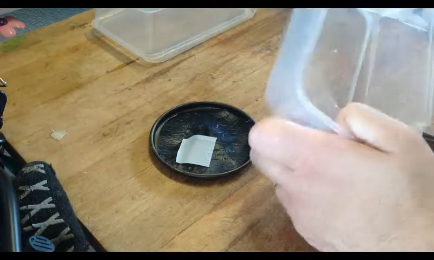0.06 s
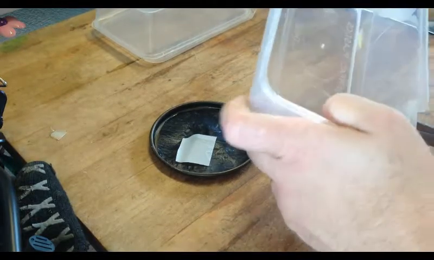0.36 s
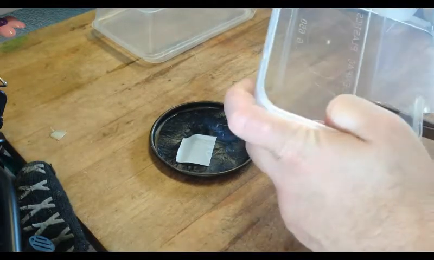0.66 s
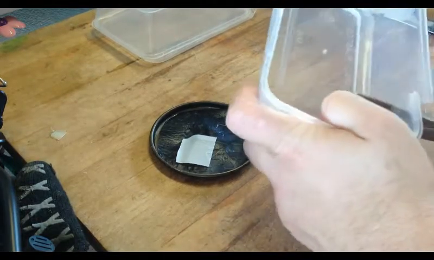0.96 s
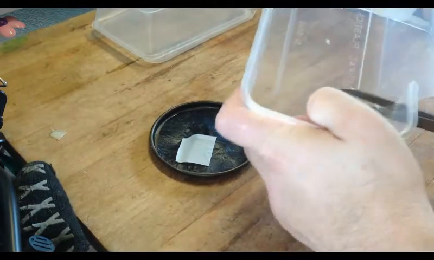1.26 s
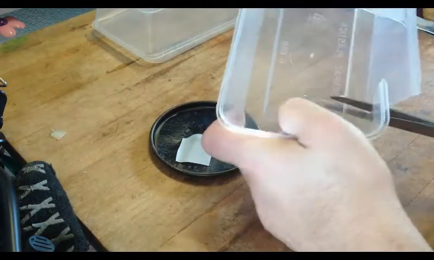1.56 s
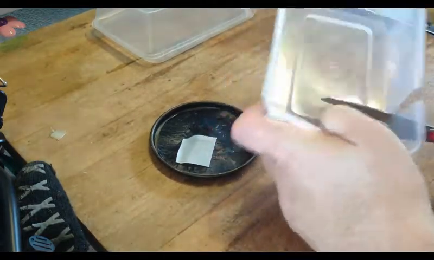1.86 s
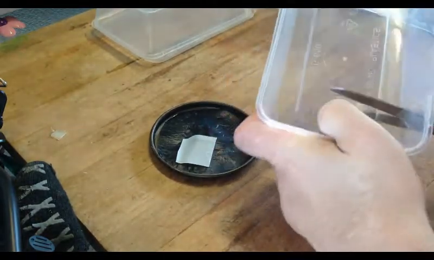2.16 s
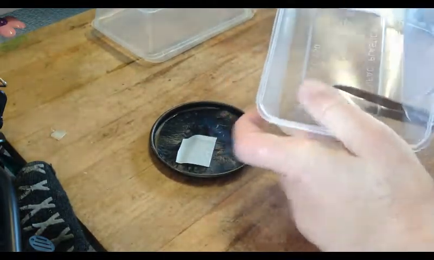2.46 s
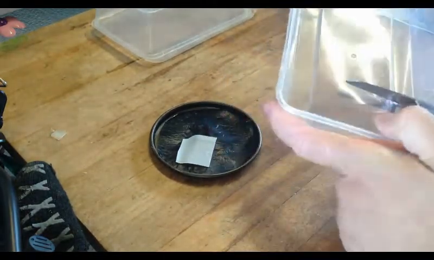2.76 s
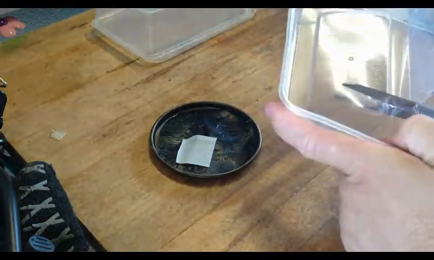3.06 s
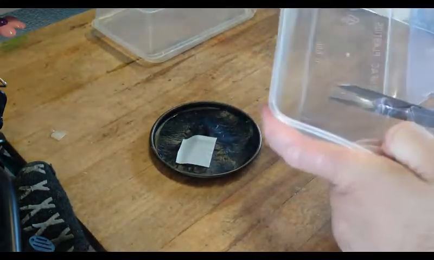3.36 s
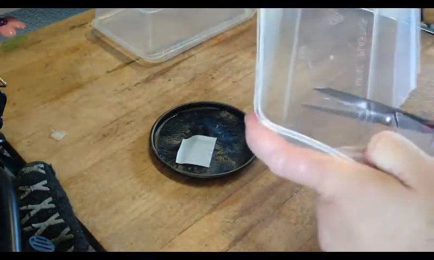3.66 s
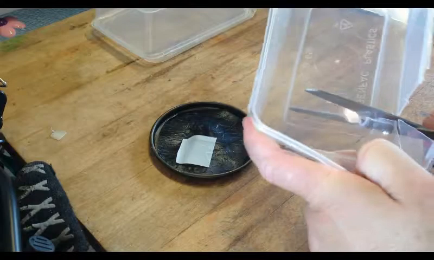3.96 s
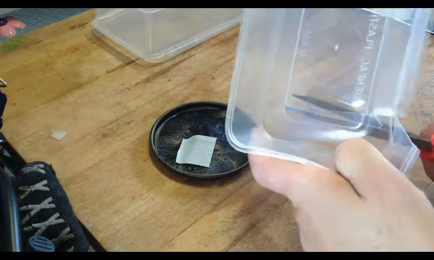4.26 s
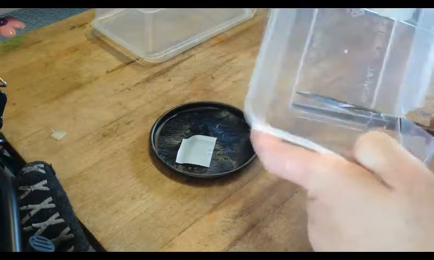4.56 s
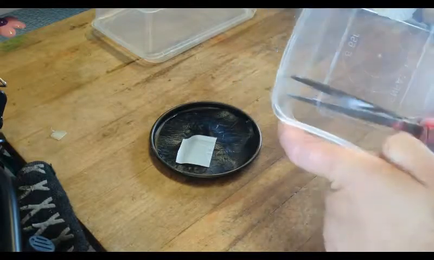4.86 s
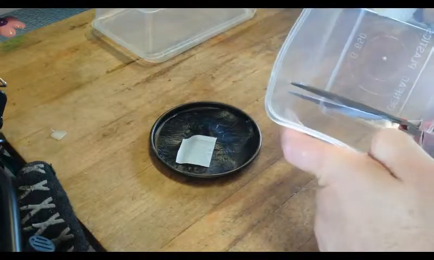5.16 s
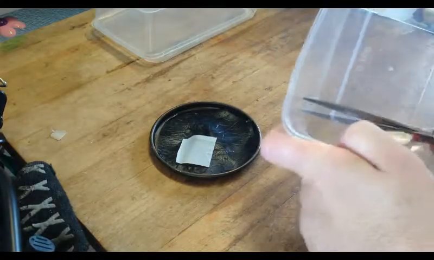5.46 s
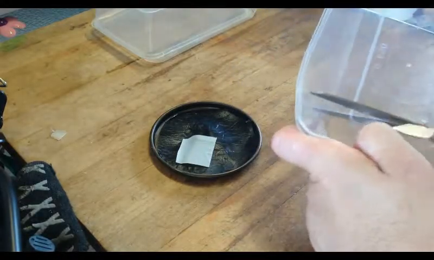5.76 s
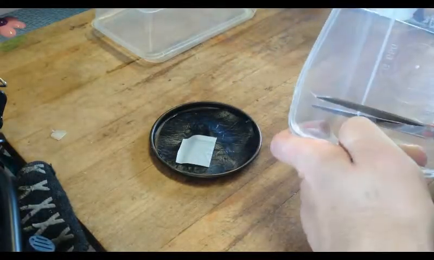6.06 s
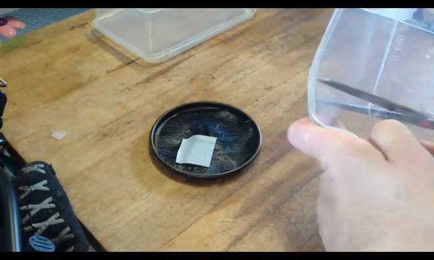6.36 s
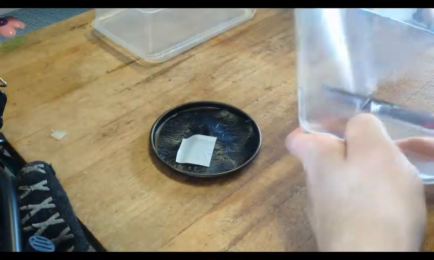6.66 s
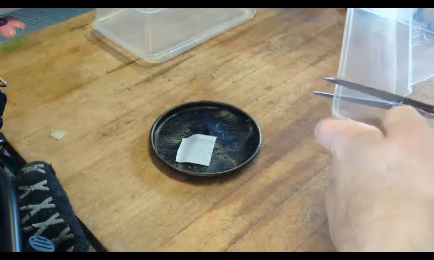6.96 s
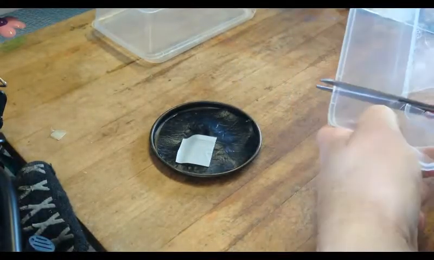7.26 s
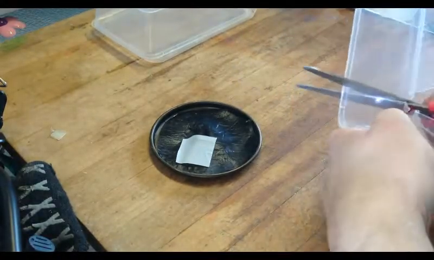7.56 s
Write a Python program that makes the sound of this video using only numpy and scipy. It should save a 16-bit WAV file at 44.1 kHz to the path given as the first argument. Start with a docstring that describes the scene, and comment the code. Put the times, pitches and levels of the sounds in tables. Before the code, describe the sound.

Close up at a workbench in a small room, a rigid plastic container snaps under scissor blades. The first hard cracks mix with hollow knocks as the plastic buckles. Gentle handling thuds and rubbing follow, then irregular clusters of loud snaps, growing lighter toward the end. Small scrapes and brief squeaks fill the gaps, and a faint rumble and hiss lie underneath.

```python
"""Scissors cut through a stiff plastic food tub, held above a wooden workbench in a small room.
A sharp crack opens the cut; the bending wall knocks dully, then cracks again just before 2 seconds.
A quieter stretch follows, with soft bumps of the hand. From about 4 seconds the cracks come in bunches,
and lighter ones end the scene. In between, blades and fingers rub, tick and squeak on the plastic.
All along there is a low rumble and a faint hiss; both dip after most of the hardest cracks."""
import sys
import numpy as np
from scipy import signal
from scipy.fft import rfft, irfft
from scipy.io import wavfile

SR = 44100
rng = np.random.default_rng(int(sys.argv[2]) if len(sys.argv) > 2 else 0)


def transcribe(u):
    """Save the signal u as a 16-bit wav file named by the first command-line argument.

    u: samples, shape (n,) or (channels, n), limited to [-1, 1]; the rate is SR.
    q: integer samples, one column per channel.
    """
    v = np.clip(np.atleast_2d(u).T, -1, 1)
    q = np.round(v * 32767).astype(np.int16)
    wavfile.write(sys.argv[1], SR, q)


N = 344024
TIME = np.arange(N) / SR
BAND_EDGES = np.geomspace(70, 17000, 22)   # in Hz: 21 bands, from low to high
BAND_HZ = np.sqrt(BAND_EDGES[1:] * BAND_EDGES[:-1])
BAND_SHARES = np.diff(BAND_EDGES) / (SR / 2)   # how much of the whole range each band covers

# The blades crack through the wall. Each row: start in seconds, level near 3000 Hz in dB, extra dB for
# the middle, extra dB for the treble, ringing pitch in Hz, fade time in seconds.
CRACK_EVENTS = [(0.0773, 13.5, -9, -6.5, 4910, 0.0016), (0.539, -1.5, 0.5, -6.5, 1930, 0.0015),
                (1.0466, -9, -8.5, -7.5, 2580, 0.0032), (1.0915, 5.5, -11, -2.5, 4100, 0.00088),
                (1.2403, 1, -11.5, 2, 7930, 0.00086), (1.755, -1.5, -17, -13.5, 2480, 0.0012),
                (1.7694, 10.5, -4.5, -13, 2536, .0046), (1.7797, 13.5, -1.5, -10.5, 916, 0.0021),
                (2.404, -11.5, -5.5, -7.5, 1770, .015), (2.4595, -30, 9, -1, 4060, 0.002),
                (2.519, -20, -4.5, -2, 4100, .001), (2.9767, -9, -7, -7.5, 2580, .0014),
                (3.8046, 12, -5, -11.5, 930, 0.0021), (4.0349, 3, -1.5, -2, 3910, 0.00097),
                (4.0655, 8, 8, -4, 3750, 0.00096), (4.0722, 5.5, -0.5, -2, 956, 0.0038),
                (4.712, 0, 5, -14, 3860, 0.0021), (4.919, 12, 3.5, -12.5, 1770, 0.0041),
                (4.9338, 18, -17.5, -15, 2630, .001), (5.463, -11.5, 1, -10, 2220, .004),
                (5.5818, -15.5, -5, -14, 2280, .0036), (5.7108, 4, -3, -11, 1705, 0.0041),
                (5.733, -5, 7, -7.5, 290, .003), (5.748, -9, -3.5, -10.5, 2900, .0035),
                (5.801, -11.5, -1.5, -15, 2500, 0.0033), (5.8205, -19.5, 7, 1.5, 1710, 0.0012),
                (5.8548, 8.5, 7, -2, 850, 0.0018), (6.402, -17.5, -0.5, -12, 4770, .0015),
                (6.4212, -10, -9.5, -17.5, 2420, 0.0063), (6.5908, 15.5, 1, -10.5, 4120, 0.0023),
                (6.5994, 11, -0.5, -5, 5000, 0.00081), (6.613, 4.5, 1, -4.5, 2570, 0.0019),
                (7.1283, 7.5, -8, -4.5, 5130, .0012), (7.473, -14, 2.5, -10, 1160, 0.0012),
                (7.52, -7, 7, -11, 2740, 0.0035), (7.531, -9, 2, -11, 2800, 0.0015),
                (7.688, -17.5, -4, -17, 1050, .0027), (7.7684, -10.5, -2.5, -29, 1770, 0.00071),
                (7.7956, -5.5, -12, -17, 3030, 0.0011)]

def cracks(bass_db=-7.5):
    """List the sharp, bright snaps of plastic breaking at the blades."""
    return [(start, band_levels(level_db, middle_db + bass_db, middle_db, treble_db), ring_hz, fade)
            for start, level_db, middle_db, treble_db, ring_hz, fade in CRACK_EVENTS]

def fracture_burst(noise, fade, rise_cycles=0.73, fade_cycles=1.5, click_cycles=0.89, click_share=0.29):
    """One sharp click and a burst of tiny breaks, one row per band; low notes outlast high ones."""
    t, hz = np.arange(2600) / SR, BAND_HZ[:, None]
    attack = (1 - np.exp(-t * hz / rise_cycles)) ** 2
    decay = np.exp(-t / (0.76 * fade + fade_cycles / hz))
    crackle = energy_one(noise[:, :len(t)] * attack * decay)
    # The click starts all bands in step. They overlap and add up, so it is halved.
    click = 0.5 * energy_one(np.sin(2 * np.pi * hz * t) * attack * np.exp(-t * hz / click_cycles))
    return np.sqrt(1 - click_share) * crackle + np.sqrt(click_share) * click

# The bent wall buckles or a finger knocks on it. Each row: start in seconds, level near 1000 Hz in dB,
# extra dB for the bass, frequency in Hz above which it turns dull, ringing pitch in Hz.
KNOCK_EVENTS = [(0.135, -5, -15, 1780, 1070), (0.2717, -6, -6, 1340, 1820),
                (0.4453, -12.5, -35, 1405, 1870), (.88, -4, -4.5, 900, 815), (0.897, 0.5, -6.5, 1070, 826),
                (1.134, 9.5, -14, 2370, 1830), (1.1728, 10, -18, 2080, 1910), (1.19, 5, 4, 2280, 930),
                (1.2703, -6.5, 11, 3600, 1650), (1.4116, -21, 11.5, 3410, 345),
                (1.5869, -17.5, 13.5, 2480, 322), (1.923, -17, -11, 2600, 1670),
                (2.098, -19.5, 2, 2200, 470), (2.1512, -22.5, 7, 1610, 464), (2.283, -21, 8, 2700, 884),
                (2.6394, -11, 0, 1300, 1520), (2.9247, -16, 11, 2480, 955), (3.007, -4, -2, 700, 628),
                (3.077, -28.5, 14, 1400, 272), (3.436, -23, 11.5, 1190, 462), (4.1078, 0.5, -9, 2700, 1010),
                (4.291, -5.5, -6.5, 1700, 1116), (4.589, -19, 14.5, 2800, 280), (4.895, 2, 11, 2450, 884),
                (4.911, 3.5, 11.5, 2700, 424), (4.925, 9.5, -2.5, 1850, 1090),
                (4.9876, 1, -10.5, 2150, 947), (5.3343, -11.5, -3, 2680, 2080),
                (5.3551, -9.5, 1, 1150, 817), (5.5451, -3.5, 2, 2100, 637), (5.5502, 0.5, 2, 2250, 1210),
                (5.6854, -6.5, 1, 2300, 535), (5.836, -4, -3, 1900, 624), (6.3389, -14, 0.5, 2200, 531),
                (6.3513, -9.5, -5, 1580, 834), (6.362, -14.5, 5, 2080, 910), (6.4598, -10, 10, 1500, 650),
                (6.557, 2.5, 8.5, 2090, 390), (6.9109, -2.5, -16, 2500, 2480), (7.247, -5, 9.5, 2900, 285)]

def knocks(fade_s=0.002, db_per_octave=12.5):
    """List the dull knocks: the softer the contact, the lower its treble starts to fall away."""
    bass_share = np.interp(np.log(BAND_HZ), np.log(TONE_RANGES[:2]), [1, 0])
    hits = []
    for start, level_db, bass_db, dull_hz, ring_hz in KNOCK_EVENTS:
        treble_loss_db = db_per_octave * np.maximum(np.log2(BAND_HZ / dull_hz), 0)
        hits.append((start, level_db + bass_db * bass_share - treble_loss_db, ring_hz, fade_s))
    return hits

def wall_ring(hz, main_cycles=6.4, hollow_cycles=19, hollow_db=-11):
    """The loose piece of wall rings at one main pitch and three hollow ones, new with each bend."""
    t = np.arange(2600) / SR
    main = energy_one(np.sin(2 * np.pi * hz * t) * np.exp(-t * hz / main_cycles))
    hollow_hz = 500 * (3500 / 500) ** rng.random((3, 1))
    hollow = energy_one(np.sin(2 * np.pi * hollow_hz * t) * np.exp(-t * hollow_hz / hollow_cycles))
    return np.append(hz, hollow_hz), np.vstack([main, from_db(hollow_db) * hollow])

# The tone shared by all cracks, knocks and ticks. Each row: frequency in Hz, boost or cut in dB.
HIT_TONE = [(90, -12), (180, -4), (400, -0.5), (900, 3), (1400, -3), (2500, 1.5), (4500, 0.5), (7000, 3.5),
            (11000, 1), (15000, -3.5)]

def plastic_hits(hits, trim_db=-1, ring_db=3, lead_s=0.0001):
    """Play the listed hits: each time the plastic gives way, it makes a burst, a ring and an echo."""
    out, noise, echo = np.zeros(N), noise_bands(), room_echo()
    size = echo.shape[1]
    offsets = rng.integers(0, N - size, len(hits))
    for (start, levels_db, ring_hz, fade), offset in zip(hits, offsets):
        gains = from_db(levels_db + trim_db + at_hz(HIT_TONE, BAND_HZ)) * np.sqrt(BAND_SHARES)
        grain = noise[:, offset:offset + size]
        add(out, start - lead_s, gains @ fracture_burst(grain, fade))
        pitches, rings = wall_ring(ring_hz)
        add(out, start, from_db(ring_db) * np.interp(pitches, BAND_HZ, gains) @ rings)
        add(out, start, gains @ (echo * grain[:, ::-1]))
    return out

# Blades and fingers slide over the plastic. Each row: loudest moment in seconds, rise in seconds,
# fall in seconds, level near 3000 Hz in dB, extra dB for the middle and bass.
STROKES = [(.01, 0.03, .05, -52, 3.5), (.075, .021, .011, -46.5, 1.5), (0.269, 0.04, 0.043, -58, 13.5),
           (0.506, 0.031, 0.083, -60, 11), (.895, 0.054, 0.061, -58, 16.5),
           (1.166, 0.064, 0.17, -53.5, 10.5), (1.751, 0.07, 0.025, -51, 9), (1.939, 0.071, 0.066, -54, 2.5),
           (2.4, 0.18, 0.1, -55.5, -1.5), (2.65, 0.08, 0.088, -69, 19), (3.659, 0.054, 0.058, -51, 4),
           (3.793, .081, 0.0084, -48.5, 4.5), (4.107, 0.03, 0.051, -48.5, 10.5),
           (4.31, 0.046, 0.035, -59, 19.5), (4.469, 0.041, 0.2, -63, 10), (4.706, 0.047, .03, -43, 7.5),
           (4.903, 0.0089, .015, -36, 10), (5.12, .034, 0.052, -62, 9.5), (5.345, 0.045, .11, -56.5, 7.5),
           (5.62, 0.13, 0.084, -54, 14), (5.718, 0.046, .041, -42.5, 9.5), (5.81, 0.033, 0.086, -45, 6.5),
           (6.009, 0.034, 0.058, -67.5, 14.5), (6.282, 0.1, 0.054, -51.5, 11.5),
           (6.439, 0.052, 0.12, -54.5, 7.5), (6.82, 0.11, 0.067, -57.5, 5.5),
           (6.93, 0.023, 0.066, -51.5, 3.5), (7.489, 0.066, 0.06, -43, 1), (7.67, 0.032, 0.12, -55, 0.5),
           (7.788, 0.014, 0.058, -35.5, -8)]
# The tone shared by all strokes. Each row: frequency in Hz, boost or cut in dB.
STROKE_TONE = [(90, -8.5), (200, -4), (500, -1.5), (1000, -1.5), (2500, 2.5), (4500, 1.5), (9000, 2),
               (15000, -9)]

def rubbing(slips_per_s=480, slip_fade_s=0.0017, grit=0.65, trim_db=1.5, bass_db=1, treble_db=-13.5):
    """The surfaces stick and slip: smooth noise and tiny uneven bursts swell and fade with each stroke."""
    slip_starts = rng.random(N) < slips_per_s / SR
    slips = slip_starts * from_db(12 * np.minimum(rng.exponential(1, N), 3))
    slip_power = signal.lfilter([1], [1, -np.exp(-2 / (slip_fade_s * SR))], slips + 1e-18)
    roughness = np.sqrt(1 - grit + grit * slip_power / slip_power.mean())
    out, friction = np.zeros(N), noise_bands()
    for peak, rise, fall, level_db, middle_db in STROKES:
        span = slice(max(int((peak - 2 * rise) * SR), 0), int((peak + 3 * fall) * SR))
        t = TIME[span] - peak
        pressure = from_db(-20 * np.abs(t / np.where(t < 0, rise, fall)) ** 1.4)
        levels_db = band_levels(level_db + trim_db, middle_db + bass_db, middle_db, treble_db)
        gains = from_db(levels_db + at_hz(STROKE_TONE, BAND_HZ)) * np.sqrt(BAND_SHARES)
        out[span] += pressure * roughness[span] * (gains @ friction[:, span])
    return out

def ticks(boost_db=23.5, spread_db=4, treble_db=-17, fade_s=0.0016):
    """List the small ticks of an edge catching three times per stroke, harder in louder strokes."""
    hits = []
    for peak, rise, fall, level_db, middle_db in STROKES:
        for when, strength, pitch in rng.uniform(-1, 1, (3, 3)):
            start = peak + 0.7 * when * (rise if when < 0 else fall)
            tick_db = level_db + boost_db + spread_db * strength
            ring_hz = 600 * (3000 / 600) ** abs(pitch)
            hits.append((start, band_levels(tick_db, middle_db, middle_db, treble_db), ring_hz, fade_s))
    return hits

# The notes at which tub and blades ring. Each row: pitch in Hz, width in Hz, level in dB.
TUB_NOTES = [(187, 50, 0.5), (248, 92, -3.5), (335, 63, -2), (492, 17, -4.5), (687, 51, -9.5),
             (956, 110, -3), (1240, 28, -1.5), (1620, 47, 1.5), (1752, 290, -3.5), (2580, 140, -5),
             (3660, 43, -3), (4050, 75, -5), (4540, 84, -3), (4980, 49, -7.5), (5300, 32, -6)]

def tub_ring(contacts, direct_db=-0.5):
    """Each contact is heard directly and also sets the tub and blades ringing."""
    ringing = sum(from_db(db) * resonance(contacts, hz, width_hz) for hz, width_hz, db in TUB_NOTES)
    return from_db(direct_db) * contacts + ringing

# Plastic squeaks along a blade. Each row: loudest moment in seconds, length in seconds, pitch in Hz,
# level in dB.
SQUEAK_EVENTS = [(0.888, .0065, 1940, -40), (3.791, .012, 3000, -53), (4.033, 0.014, 2750, -54),
                 (4.319, 0.021, 1800, -54), (4.47, 0.023, 2030, -59), (6.282, 0.038, 1864, -56),
                 (6.284, 0.024, 1080, -50), (6.356, 0.015, 1120, -50.5), (7.309, 0.0087, 1440, -48.5),
                 (7.338, 0.012, 1430, -51.5), (7.365, 0.044, 1400, -60), (7.451, 0.014, 2760, -52)]

def squeaks(width_hz=440, size=8000):
    """Friction catches on one note of the wall for a moment."""
    out, t = np.zeros(N), (np.arange(size) - size / 2) / SR
    for peak, length, hz, level_db in SQUEAK_EVENTS:
        tone = rms_one(pitched_noise(size, hz, width_hz))
        swell = np.exp(-2 * (t / length) ** 2)
        add(out, peak + t[0], from_db(level_db) * tone * swell)
    return out

# The hand bumps the tub. Each row: start in seconds, peak level in dB, pitch in Hz.
BUMP_EVENTS = [(0.289, -48, 122), (1.8, -41, 328.5), (2.15, -51.5, 157), (2.64, -45.5, 157),
               (3.018, -45, 159), (3.076, -40.5, 112), (3.446, -41.5, 127), (4.974, -47.5, 176),
               (7.548, -51, 387.5)]

def hand_bumps(rise_s=0.0023, fade_s=0.02, width_hz=70, size=5000):
    """The soft hand makes the whole tub flex with a low thud that dies quickly."""
    out, t = np.zeros(N), np.arange(size) / SR
    for start, peak_db, hz in BUMP_EVENTS:
        flex = pitched_noise(2 * size, hz, width_hz)[size:]   # the second half is at full strength
        thud = flex * (1 - np.exp(-t / rise_s)) * np.exp(-t / fade_s)
        add(out, start, from_db(peak_db) * thud / np.abs(thud).max())
    return out

# How long the room echoes. Each row: frequency in Hz, seconds to fade by 60 dB.
ECHO_TIMES = [(150, 0.77), (500, 0.25), (1500, 0.25), (4000, 0.1768), (9000, 0.2), (15000, 0.1)]
# How strongly the room echoes. Each row: frequency in Hz, level in dB compared with the hit.
ECHO_LEVELS = [(150, -18.5), (500, -16.5), (1500, -16.5), (4000, -11), (9000, -17), (15000, -8.5)]

def room_echo(delay_s=0.0018, build_up_s=0.0014):
    """How the short echo from the bench and nearby walls swells and fades, one row per band."""
    t = np.arange(8000) / SR
    arrival = np.clip((t - delay_s) / build_up_s, 0, 1)
    decay = from_db(-60 * t / at_hz(ECHO_TIMES, BAND_HZ)[:, None])
    return from_db(at_hz(ECHO_LEVELS, BAND_HZ))[:, None] * energy_one(arrival * decay)

# The tones of the hiss and the rumble. Each row: frequency in Hz, boost or cut in dB.
HISS_TONE = [(90, 2), (400, 8), (900, 2.5), (2500, 2.5), (6000, 1), (12000, -1), (15000, -4)]
RUMBLE_TONE = [(25, -12), (50, -5), (80, 2), (130, -2.5), (190, -1.5), (270, -24), (400, -22.5),
               (800, -34.5), (3000, -61)]
# How the rumble wavers. Each row: swings per second, strength in dB.
RUMBLE_WAVER = [(3, -6), (12, 0), (25, -8), (60, -40), (200, -80)]
# The background dips after hard cracks. Each row: start in seconds, depth in dB (below zero: no dip).
BACKGROUND_DIPS = [(.1, 11.5), (1.26, 5.5), (1.8, -2.5), (3.82, 11), (4.089, 5), (4.95, 6.5), (5.87, 10),
                   (6.611, 9.5)]

def background(hiss_db=-67.5, rumble_db=-60.5, waver_db=2, drop_s=0.04, recovery_db_per_s=8):
    """A faint hiss and a wavering low rumble dip together, then creep back at a steady rate."""
    dip_db = np.zeros(N)
    for start, depth_db in BACKGROUND_DIPS:
        onset = np.clip((TIME - start) / drop_s, 0, 1)
        remaining_db = np.maximum(depth_db - recovery_db_per_s * (TIME - start), 0)
        dip_db = np.maximum(dip_db, onset * remaining_db)
    hiss = from_db(hiss_db - dip_db) * coloured_noise(HISS_TONE)
    rumble = from_db(rumble_db - dip_db) * rms_one(coloured_noise(RUMBLE_TONE))
    waver = rms_one(coloured_noise(RUMBLE_WAVER))
    return hiss + rumble * from_db(waver_db * waver)

# The centres of the bass, middle, upper middle and treble, in Hz.
TONE_RANGES = [330, 1000, 3000, 9000]

def band_levels(level_db, bass_db, middle_db, treble_db):
    """The level of every band, set as with bass, middle and treble knobs."""
    return level_db + np.interp(np.log(BAND_HZ), np.log(TONE_RANGES), [bass_db, middle_db, 0, treble_db])

def noise_bands():
    """Separate, equally strong noise in every band."""
    filters = [signal.butter(2, edges, "band", fs=SR, output="sos")
               for edges in zip(BAND_EDGES, BAND_EDGES[1:])]
    return np.array([rms_one(signal.sosfilt(sos, rng.standard_normal(N))) for sos in filters])

def coloured_noise(tone):
    """Steady noise shaped by a table of frequencies and levels."""
    hz = np.maximum(np.arange(N // 2 + 1) * SR / N, 1)
    return irfft(rfft(rng.standard_normal(N)) * from_db(at_hz(tone, hz)), N)

def pitched_noise(size, hz, width_hz):
    """Noise narrowed twice around one pitch."""
    return resonance(resonance(rng.standard_normal(size), hz, width_hz), hz, width_hz)

def resonance(x, hz, width_hz):
    """Let a sound ring at one pitch; a smaller width rings longer."""
    r = np.exp(-np.pi * width_hz / SR)
    feedback = [1, -2 * r * np.cos(2 * np.pi * hz / SR), r * r]
    return signal.lfilter((1 - r * r) / 2 * np.array([1, 0, -1]), feedback, x + 1e-18)

def at_hz(table, hz):
    """Read a table at any frequency, sliding between its rows."""
    frequencies, values = np.array(table).T
    return np.interp(np.log(hz), np.log(frequencies), values)

def from_db(db):
    """Turn decibels into a number to multiply by."""
    return 10 ** (np.asarray(db) / 20)

def rms_one(x):
    """Scale a sound to an average strength (rms) of one."""
    return x / np.sqrt(np.mean(x ** 2) + 1e-20)

def energy_one(x):
    """Scale each row to a total energy of one."""
    return x / np.sqrt(np.sum(x ** 2, axis=-1, keepdims=True) + 1e-20)

def add(out, start_s, sound):
    """Mix a sound in at the given time."""
    start = max(int(start_s * SR), 0)
    out[start:start + len(sound)] += sound[:max(N - start, 0)]

def scene():
    """Hits and rubbing ring through the tub; squeaks, bumps and background join them in one channel."""
    contacts = plastic_hits(cracks() + knocks() + ticks()) + rubbing()
    return (tub_ring(contacts) + squeaks() + hand_bumps() + background())[None, :]

def record(dry, ceiling=0.88, cutoff_hz=15400):
    """Round off the tallest peaks and cut the very highest treble."""
    lowpass = signal.ellip(10, 0.1, 80, cutoff_hz, fs=SR, output="sos")
    return signal.sosfilt(lowpass, ceiling * np.tanh(dry / ceiling))

dry = scene()
out = record(dry)
transcribe(out)
```